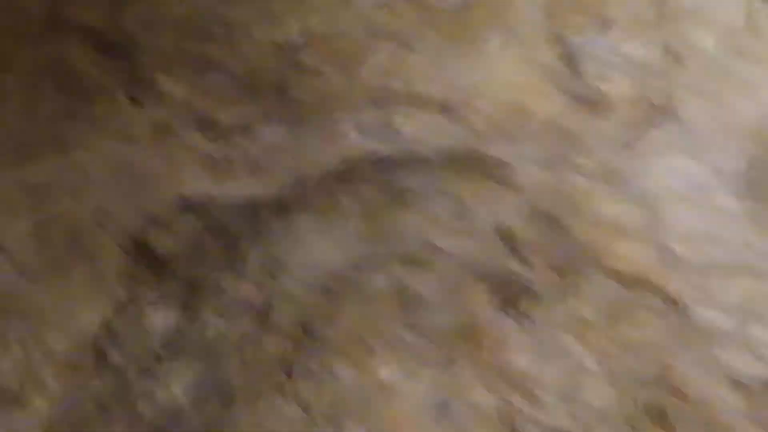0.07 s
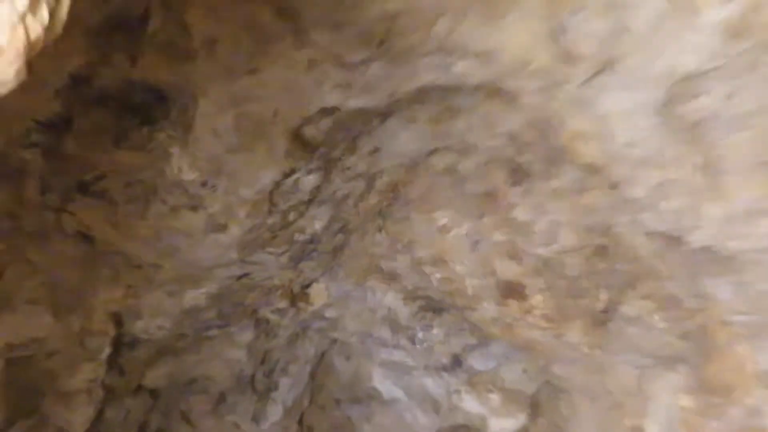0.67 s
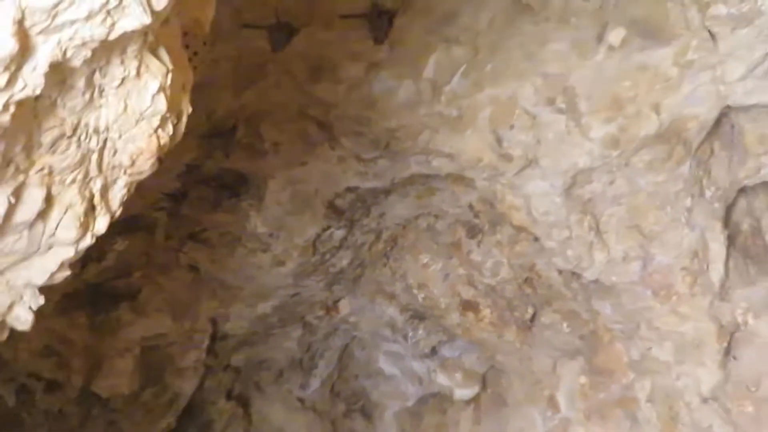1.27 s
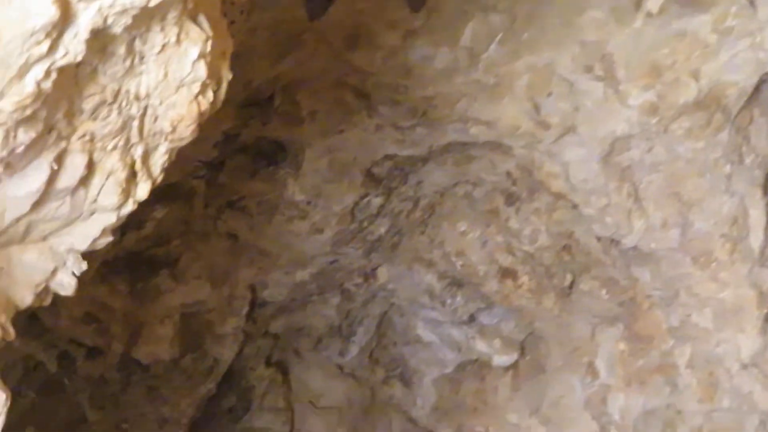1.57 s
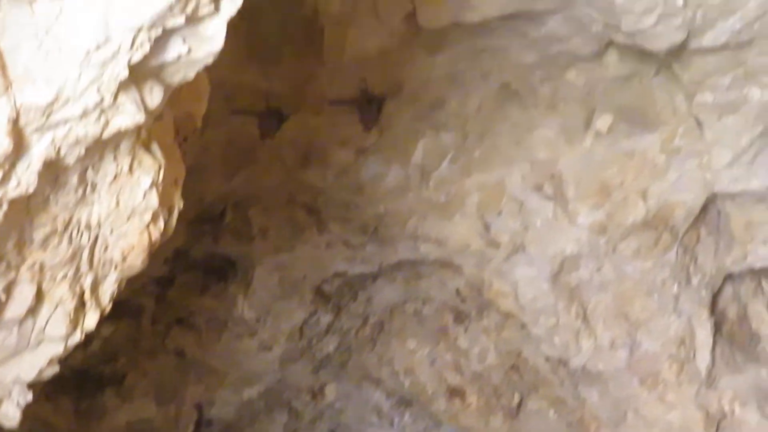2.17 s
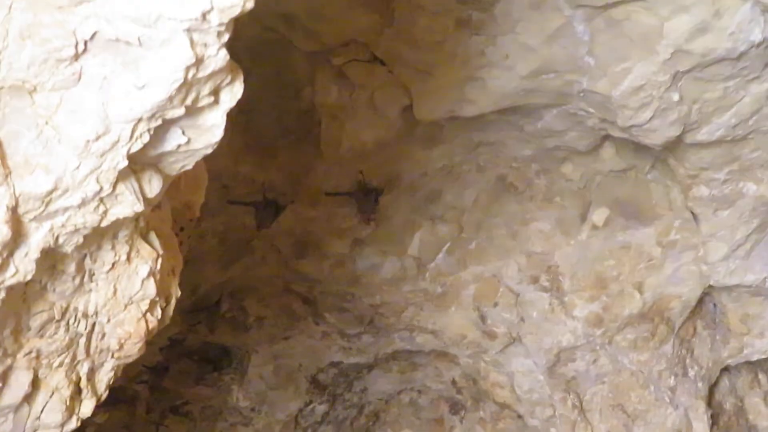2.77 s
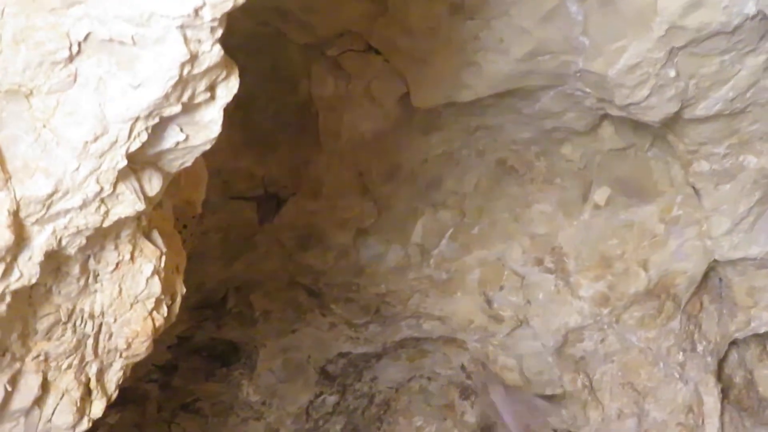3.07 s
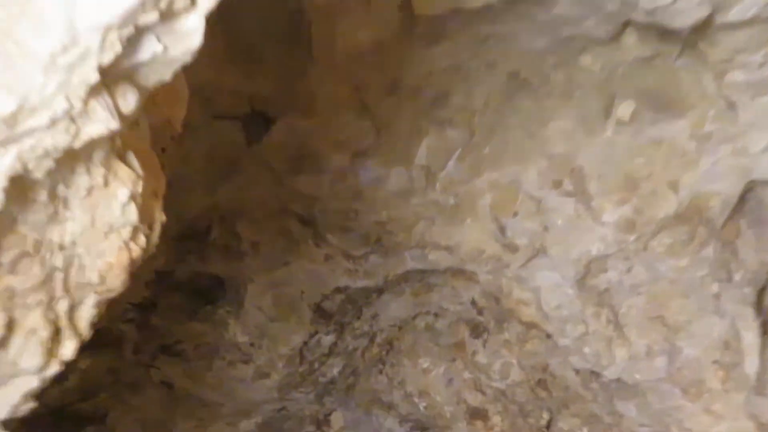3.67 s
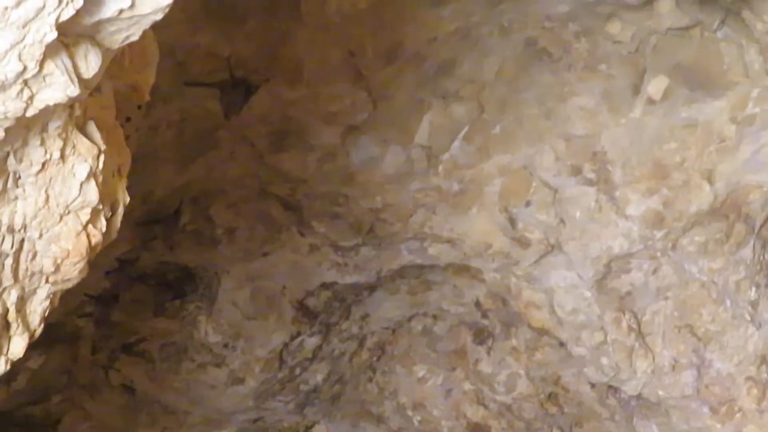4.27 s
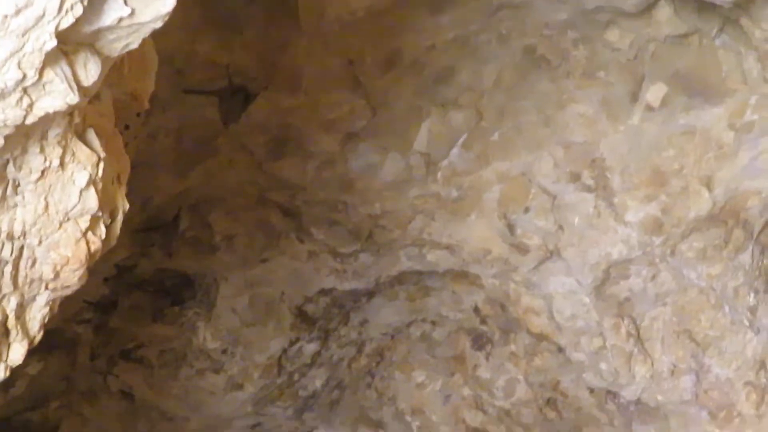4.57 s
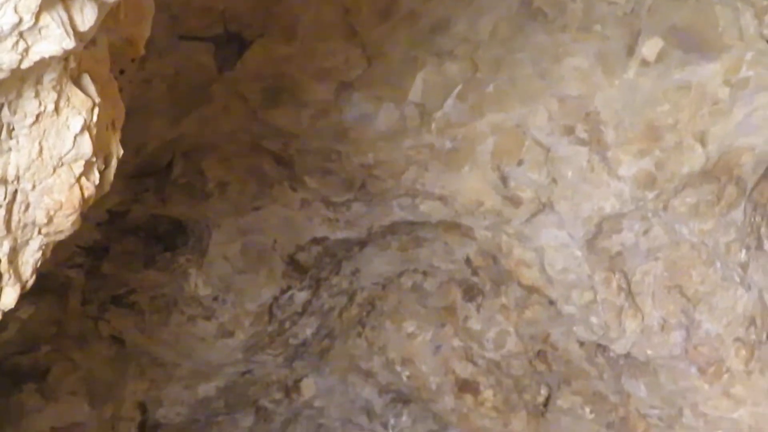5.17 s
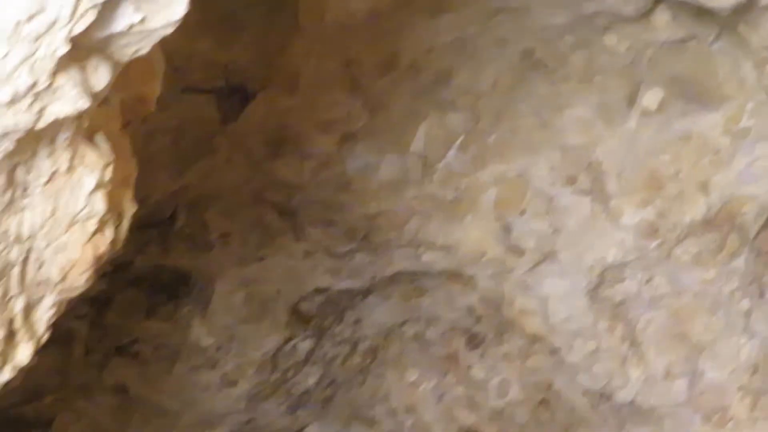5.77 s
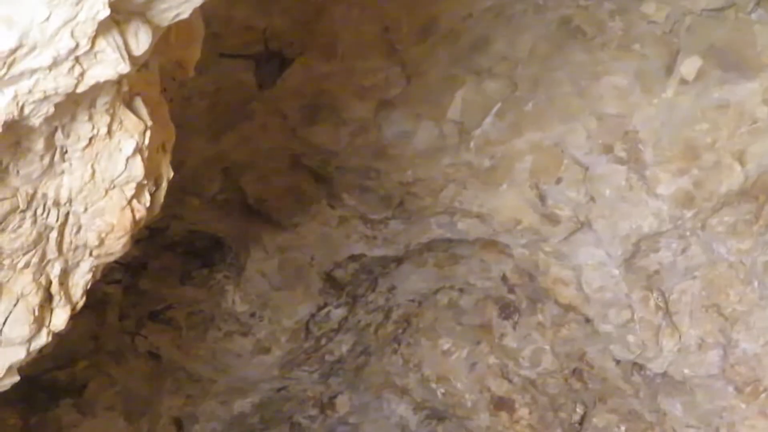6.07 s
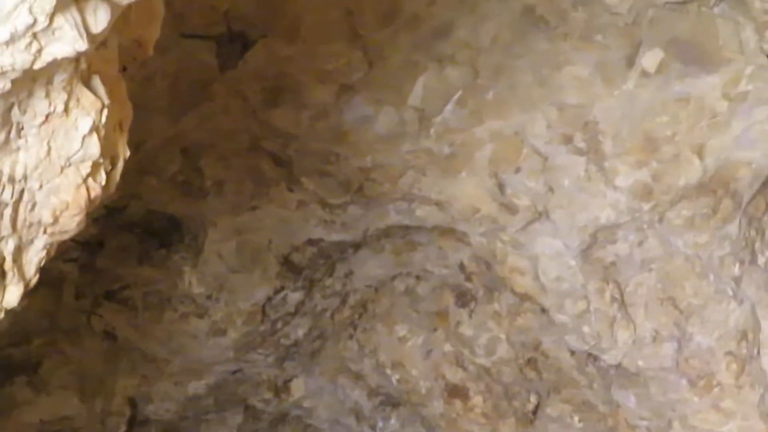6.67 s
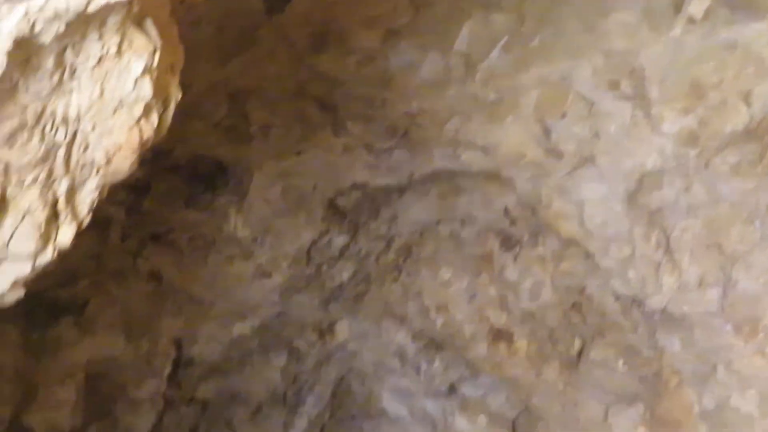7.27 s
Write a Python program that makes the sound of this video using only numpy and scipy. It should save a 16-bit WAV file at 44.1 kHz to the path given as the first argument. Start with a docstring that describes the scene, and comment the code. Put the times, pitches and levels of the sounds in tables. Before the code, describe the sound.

Small bats give very high chirps in a rocky cave, over soft hiss, camera whirring, handling bumps and one hard knock.

```python
"""Bats in a rocky cave

Small bats chirp: each call is a steep downward whistle, smeared by echoes off the rock. Behind them
are a soft rush of air, hiss, a hollow drone and faint pips. A hand-held camera rumbles, its zoom
motor whirs twice and fingers bump and scuff its body. The hardest knock overloads the microphone,
and the gain control takes about a second to recover."""
import sys
import numpy as np
from scipy import signal
from scipy.fft import rfft, irfft, next_fast_len
from scipy.io import wavfile
from scipy.ndimage import map_coordinates

SR = 44100
rng = np.random.default_rng(int(sys.argv[2]) if len(sys.argv) > 2 else 0)


def dump_mix(stems):
    """Bounce the given channels to the path in sys.argv[1] as a 16-bit WAV at rate SR."""
    frames = np.atleast_2d(stems).T  # one column per channel
    limited = np.clip(frames, -1, 1)  # hard clip at full scale
    pcm = np.round(limited * 32767).astype(np.int16)
    wavfile.write(sys.argv[1], SR, pcm)


N = 328104

# Runs of the zoom motor. Each row: start and stop in seconds, level in dB, rattle in dB relative to it,
# change of the hiss meanwhile in dB, start of the hiss swell that follows in seconds.
ZOOMS = [(0.086, 1.247, -55.5, -25, -5.5, 1.3), (3.546, 3.743, -56, -3, 0, 3.98)]


def amp(db):
    return 10 ** (np.asarray(db) / 20)


def unit(x):
    return x / np.sqrt(np.mean(x ** 2) + 1e-20)


def seconds(length):
    return np.arange(round(length * SR)) / SR


def since(s):
    """Seconds since time s, zero before it."""
    return np.maximum(np.arange(N) / SR - s, 0)


def swell(s, width_s):
    """Rises to 1 at time s and falls away again."""
    return np.exp(-np.abs(np.arange(N) / SR - s) / width_s)


def wobble(rate):
    """A smooth random curve, rate knots a second."""
    return map_coordinates(rng.standard_normal(int(N * rate / SR) + 4), [np.arange(N) * rate / SR])


def filtered(x, response):
    """x shaped by a complex response of frequency."""
    size = x.shape[-1]
    padded = next_fast_len(size + SR // 4)
    return irfft(rfft(x, padded) * response(np.fft.rfftfreq(padded, 1 / SR)), padded)[..., :size]


def resonances(modes, f):
    """Response at f of band-pass modes, each a centre in Hz, a width in Hz and a gain in dB."""
    return sum(amp(db) * 1j * f * width / (hz * hz - f * f + 1j * f * width) for hz, width, db in modes)


def noise(spectrum):
    """Noise of rms 1, coloured by (Hz, dB) points on a log axis."""
    points_hz, db = np.transpose(spectrum)
    colour = lambda hz: amp(np.interp(np.log(hz + 1), np.log(points_hz), db))
    return unit(filtered(rng.standard_normal(N), colour))


def stereo(mid, side, side_db):
    """Left and right from a common and an opposed part."""
    return np.array([mid + amp(side_db) * side, mid - amp(side_db) * side])


def burst(t60, response):
    """A dying stereo puff of noise that takes the colour of the response and keeps its energy."""
    t, onset_s = seconds(.15), .0007
    puff = stereo(*rng.standard_normal((2, len(t))), side_db=-5.5) * amp(-60 * t / t60)
    rung = filtered(puff, response) * (1 - np.exp(-t / onset_s))
    return rung * np.linalg.norm(puff) / np.linalg.norm(rung)


def add(track, s, sound):
    """Mix a sound into the track at time s."""
    part = track[:, max(round(s * SR), 0):][:, :sound.shape[1]]
    part += sound[:, :part.shape[1]]


def air():
    """Air rushes softly in the cave mouth; hiss sinks during the long zoom and swells after each zoom."""
    # Course of the rush. Each row: time in seconds, level in dB, stereo width of its bass in dB.
    course = [(.1, -52, 1), (2.4, -53, 0.5), (3.5, -54.5, -12), (4.5, -55.5, -8.5), (5.1, -53.5, -10.5),
              (6.0, -53.5, 1.5), (7.44, -53.5, 3.5)]
    # Colour of the air, centre and sides. Each row: frequency in Hz, relative level in dB.
    mid_spectrum = [(53, -22.5), (90, -3), (183, -3), (259, -4.5), (328, -6.5), (381, -6), (415, -7),
                    (653, -12), (810, -10.5), (1140, -15), (1920, -17), (4540, -23), (12000, -35.5),
                    (14500, -43.5), (15500, -48.5)]
    side_spectrum = [(53, -28), (100, -12), (165, -2.5), (253, -2), (342, -1), (398, -4), (443, -0.5),
                     (510, -7.5), (626, -6), (1050, -9), (1720, -13), (1880, -13), (8120, -29.5),
                     (13300, -41.5), (15500, -50.5)]
    times, *columns = np.transpose(course)
    rush_db, width_db = [np.interp(since(0), times, column) for column in columns]
    side = noise(side_spectrum)
    side_bass = filtered(side, lambda hz: 1 / (1 + (hz / 480) ** 4))
    full = stereo(noise(mid_spectrum), side + (amp(width_db) - 1) * side_bass, side_db=-1.5)
    rush = filtered(full, lambda hz: 1 / (1 + (hz / 1200) ** 4))
    hiss_db, rise_s, fall_s = -57.5, .18, .19
    rise = lambda s: 1 - np.exp(-since(s) / rise_s)
    dip_db = sum(db * (rise(start) - rise(after)) for start, *_, db, after in ZOOMS)
    swells = sum(rise(after) * np.exp(-since(after) / fall_s) for *_, after in ZOOMS)
    hiss_level = np.hypot(amp(hiss_db + dip_db), amp(-46.5) * swells)
    return amp(rush_db + 1.5 * wobble(7.9)) * unit(rush) + hiss_level * unit(full - rush)


def drone():
    """A hollow, narrow band of noise swells and sinks, each time at a slightly different pitch."""
    # Swells of the drone. Each row: time of the peak in seconds, level in dB, pitch in Hz.
    peaks = [(.28, -52, 393), (.92, -51, 397), (1.19, -54.5, 400), (1.97, -52.5, 380), (2.15, -51.5, 395),
             (3.87, -55.5, 383), (4.27, -57, 415), (4.75, -66, 440), (5.08, -57.5, 413), (5.42, -59, 455),
             (6.02, -55, 381)]

    def band(centre_hz, width_hz=66):
        white = rng.standard_normal((2, N))
        hollow = filtered(white, lambda hz: resonances([(centre_hz, width_hz, 0)], hz) ** 2)
        return unit(stereo(*hollow, side_db=-4.5))

    waver_db = 1.5 * wobble(6)
    swells = sum(amp(db) * swell(s, width_s=.1) * band(hz) for s, db, hz in peaks)
    bed = amp(-66.5) * band(centre_hz=399.3)
    return amp(waver_db) * (bed + swells)


def handling():
    """The camera rumbles softly each time the hands shift, and shudders as the grip settles."""
    # Shifts of the grip. Each row: time of the peak in seconds, level in dB, rise and fall in seconds.
    grips = [(.28, -39.5, 0.049), (.9, -56.5, 1), (2.45, -50.5, 0.16), (2.8, -47, 0.13), (3.05, -52, 0.097),
             (3.75, -53, .06), (6.0, -59.5, 0.49), (6.65, -52, 0.24), (7.3, -45.5, 0.34)]
    # Colour of the rumble. Each row: frequency in Hz, relative level in dB.
    rumble = [(15, -20), (35, -9), (50, 3.5), (75, -5), (130, -15.5), (300, -34), (900, -100)]
    # Shudders in the hand. Each row: start in seconds, level in dB, pitch in Hz, rise and t60 in
    # seconds, gain of the right side in dB.
    shudders = [(0.071, -10, 41.6, 0.024, 0.25, -2), (.262, -29, 38, .015, 0.18, -7),
                (2.725, -24.5, 44.6, 0.075, 0.41, 0), (6.59, -37, 54, .04, .35, 0),
                (7.13, -32, 62.4, 0.085, .6, 0.5), (7.18, -37, 88, .04, 0.31, -1),
                (7.272, -29.5, 57, 0.042, .45, -1)]
    still_hand_db = -67
    grip_power = sum((amp(db) * swell(s, width_s)) ** 2 for s, db, width_s in grips)
    level = np.sqrt(amp(still_hand_db) ** 2 + grip_power)
    out = level * stereo(noise(rumble), noise(rumble), side_db=-20)
    t = seconds(.5)
    for s, db, hz, rise_s, t60, right_db in shudders:
        shudder = amp(db - 60 * t / t60) * (1 - np.exp(-t / rise_s)) * np.sin(2 * np.pi * hz * t)
        add(out, s, shudder * amp([[0], [right_db]]))
    return out


def zoom_motor():
    """The motor whirs, its gears whine and the lens barrel rattles, all with a slight flutter in level."""
    # Colour of the whir. Each row: frequency in Hz, relative level in dB.
    whir_spectrum = [(200, -11), (420, -12), (650, -12), (1100, -7.5), (1800, -6.5), (2800, -7.5),
                     (4400, -12), (8000, -15.5), (14000, -33.5)]
    # Resonances of the gears and the loose barrel, each applied twice.
    # Each row: centre in Hz, width in Hz, gain per pass in dB.
    gear_modes = [(390, 25, -13), (1245, 170, 1.5), (2370, 350, 0.5), (2860, 230, 0), (4380, 300, -3)]
    barrel_modes = [(1440, 380, 7.5), (2360, 450, 4), (2950, 510, 3), (3650, 400, 3), (4270, 380, -8)]

    def ringing(modes):
        return unit(filtered(rng.standard_normal(N), lambda hz: np.abs(resonances(modes, hz)) ** 2))

    whir = amp(-5) * stereo(noise(whir_spectrum), noise(whir_spectrum), side_db=7.5)
    whine = amp(-6) * ringing(gear_modes)
    rattle = ringing(barrel_modes)
    flutter_db = .7 * wobble(25)
    spin_up_s, spin_down_s = .0047, .114
    out = np.zeros((2, N))
    for start, stop, db, rattle_db, *_ in ZOOMS:
        envelope = (1 - np.exp(-since(start) / spin_up_s)) * np.exp(-since(stop) / spin_down_s)
        out += envelope * amp(db + flutter_db) * (whir + whine + amp(rattle_db) * rattle)
    return out


def lens_ticks():
    """The lens mechanism ticks with a thin metal ping, mostly as the motor starts and stops."""
    # Ticks. Each row: start in seconds, level in dB, t60 in seconds, ping in dB relative to the tick.
    ticks = [(.095, -52.5, 0.14, -30), (0.119, -48.5, 0.45, -28), (0.159, -43, 0.044, -30),
             (1.236, -47, 0.026, -20), (1.2386, -36.5, 0.018, -21), (1.24, -48.5, 0.043, -5.5),
             (1.2477, -42, 0.02, -7), (3.55, -45.5, 0.02, -31), (3.556, -40, 0.05, -32),
             (3.5685, -35.5, 0.023, -32), (3.577, -45, 0.025, -32), (3.781, -49, 0.032, -22),
             (5.76, -47.5, 0.028, -25)]
    # Resonances of the lens and of the ping. Each row: centre in Hz, width in Hz, relative gain in dB.
    lens_modes = [(1540, 350, 7.5), (2570, 770, 11), (3530, 160, 4), (4050, 200, 0), (5900, 740, 7)]
    ping_modes = [(11600, 1100, 0)]
    dull_hz = 4700
    tick_colour = lambda hz: resonances(lens_modes, hz) / np.sqrt(1 + (hz / dull_hz) ** 14)
    out = np.zeros((2, N))
    for s, db, t60, ping_db in ticks:
        add(out, s, amp(db + ping_db) * burst(t60, lambda hz: resonances(ping_modes, hz) ** 2))
        add(out, s, amp(db) * burst(t60, tick_colour))
    return out


def scuffs():
    """Grit and skin scuff in short puffs of noise with the top rolled off."""
    # Scuffs. Each row: start in seconds, level in dB, t60 in seconds, treble cutoff in Hz.
    puffs = [(0.117, -41.5, 0.022, 6030), (0.154, -50, 0.059, 5470), (.161, -39, .04, 2400),
             (.167, -34, 0.036, 1980), (.265, -49, 0.55, 3400), (3.262, -47, 0.015, 4000),
             (3.576, -45, 0.078, 3400), (4.011, -58, .025, 3200), (4.173, -48, 0.044, 2800),
             (4.274, -48, .025, 3000), (4.308, -48.5, 0.028, 3000), (4.507, -44, 0.012, 2000),
             (4.709, -45.5, .02, 2600), (5.387, -50, 0.034, 2200), (5.4838, -40, 0.022, 1700),
             (5.4838, -40, 0.007, 6000), (5.728, -41, 0.022, 2900)]
    out = np.zeros((2, N))
    for s, db, t60, cutoff_hz in puffs:
        add(out, s, amp(db) * burst(t60, lambda hz: 1 / np.sqrt(1 + (hz / cutoff_hz) ** 10)))
    return out


def capsules(x, corner_hz):
    """The microphone capsules pass no steady pressure, so each push swings back."""
    return signal.sosfilt(signal.butter(2, corner_hz, "high", fs=SR, output="sos"), x)


def bumps():
    """A finger bump is one soft push on the capsules and a brief ring of the camera body."""
    # Fingers on the camera. Each row: time in seconds, level in dB, contact in seconds, ring in dB
    # relative to the push, gain factor of the right side, bass cut in Hz.
    touches = [(0.181, -7, 0.00082, -23, -0.38, 22), (0.183, -10, 0.0019, -32, -0.45, 22),
               (3.632, -32.5, 0.00054, -4, 0.96, 90), (3.637, -31, 0.0025, -1.5, 0.98, 70),
               (5.39, -36.5, 0.00083, -9, 0.85, 110), (5.4845, -17.5, 0.00016, -12, 1, 139),
               (5.486, -29, 0.00046, -23, 0.84, 140), (5.491, -30, 0.0004, -20, 0.64, 140),
               (5.747, -39, 0.0009, 4.5, 0.74, 100)]
    # Modes of the camera body. Each row: pitch in Hz, relative level in dB, t60 in seconds.
    body_modes = [(310, -8.5, 0.041), (438, -4.5, 0.041), (783, -14, 0.04), (1170, -4, 0.011),
                  (1730, -11.5, 0.013)]
    out, lead_s = np.zeros((2, N)), .01
    t = seconds(.12) - lead_s
    after = np.maximum(t, 0)
    ring = sum(amp(db - 60 * after / t60) * np.sin(2 * np.pi * hz * after) for hz, db, t60 in body_modes)
    for s, db, contact_s, ring_db, right, cut_hz in touches:
        push = np.exp(-(t / contact_s) ** 2)
        thud = capsules(push + amp(ring_db) * ring * (1 - push), cut_hz)
        add(out, s - lead_s, amp(db) * thud * [[1], [right]])
    return out


def end_stop():
    """The lens meets its end stop after the long zoom with a short clink."""
    # Modes of the clink. Each row: pitch in Hz, level in dB, t60 in seconds.
    modes = [(1980, -31.5, 0.036), (2590, -33.5, 0.031), (3630, -40, 0.032)]
    start_s, onset_s = 1.2455, .0014
    out, t = np.zeros((2, N)), seconds(.1)
    ring = sum(amp(db - 60 * t / t60) * np.sin(2 * np.pi * hz * t) for hz, db, t60 in modes)
    add(out, start_s, ring * (1 - np.exp(-t / onset_s)) * np.ones((2, 1)))
    return out


def knock():
    """One hard blow beside the microphone reaches the left capsule first and booms through the shell."""
    # The recorder's filter rings with a brief hollow tone just before and after the knock.
    # Each row: pitch in Hz, level in dB, rise and fall in seconds.
    filter_ringing = [(388, 2.5, 0.0018, 0.0027), (477, -16, 0.021, 0.0034)]
    hit_s, lead_s, lag_s = 2.4907, .03, .00089
    contact_s, onset_s, pre_ring_s = .00087, .0005, .016
    t = seconds(.15) - lead_s
    age = t + lag_s * np.array([[.5], [-.5]])

    def ring(time, hz, db, t60):
        after = np.maximum(time, 0)
        envelope = amp(db - 60 * after / t60) * (1 - np.exp(-after / onset_s))
        return envelope * np.sin(2 * np.pi * hz * after)

    blow = capsules(amp(3) * np.exp(-(age / contact_s) ** 2), corner_hz=33)
    blow += ring(age, hz=223, db=12, t60=.0091)  # the shell booms in both capsules alike
    # a low boom, opposite in left and right, widens the knock
    blow += ring(t, hz=167, db=-.5, t60=.022) * [[-1], [1]]
    blow -= ring(age, hz=36, db=-7.5, t60=.074)  # the whole camera recoils in the hand
    fade_in = np.clip((age + pre_ring_s) / (2 * onset_s), 0, 1)
    for hz, db, rise_s, fall_s in filter_ringing:
        envelope = fade_in * np.exp(-np.abs(age) / np.where(age < 0, rise_s, fall_s))
        blow += amp(db) * envelope * np.cos(2 * np.pi * hz * age)
    out = np.zeros((2, N))
    add(out, hit_s - lead_s, blow)
    return out


def pips():
    """Hollow pips like distant drips: a few clear ones among ten fainter ones scattered at random."""
    # The clearest pips. Each row: start in seconds, level in dB, pitch in Hz.
    clear = [(3.006, -53, 900), (3.206, -48.5, 945), (4.508, -50, 810), (4.71, -51, 825), (5.1, -54, 815)]
    faint_span_s, faint_db, faint_hz = (2.6, 5.3), -55.5, 906
    t60, width_hz = .069, 310
    faint = [(np.interp(when, (0, 1), faint_span_s),
              faint_db + 4 * (size - .5),
              faint_hz * (1 + .14 * (pitch - .5))) for when, size, pitch in rng.random((10, 3))]
    out = np.zeros((2, N))
    for s, db, hz in list(clear) + faint:
        add(out, s, amp(db) * burst(t60, lambda f: resonances([(hz, width_hz, 0)], f) ** 2))
    return out


def cave(t60, build_s, near_s=.013, near_db=-2.5, count=12):
    """Small echoes off near rock and a dense tail that builds and dies, new for each place of calling."""
    t = seconds(.2)
    tail = stereo(*rng.standard_normal((2, len(t))), side_db=-5)
    tail *= amp(-60 * t / t60) * (1 - np.exp(-t / build_s))
    tail /= np.linalg.norm(tail[0])
    arrival = (rng.uniform(.1, 1, count) * near_s * SR).astype(int) + 2
    strength = amp(near_db) * rng.choice([-1, 1], count) / np.sqrt(count)
    tail[0, arrival] += strength
    tail[1, arrival + rng.choice([-1, 0, 0, 1], count)] += strength  # each wall has its own direction
    return tail / np.linalg.norm(tail[0])


def bats():
    """Each call dives in pitch, peaks as it crosses the throat's resonance and echoes off the rock."""
    # Bat calls. Each row: start and length in seconds, first and last pitch in Hz, level in dB, echo in
    # dB relative to the call, throat resonance and its half-width in Hz, echo build-up and t60 in seconds.
    calls = [(2.9515, .012, 16300, 10000, -14.5, -4, 11240, 230, .002, .105),
             (3.915, .007, 15600, 10900, -37, 4, 12500, 900, .001, 0.075),
             (4.937, .009, 15500, 10750, -45, 6.5, 12900, 1100, .003, .07),
             (5.6828, 0.011, 13700, 8680, -15.5, 7.5, 11800, 700, .002, 0.097),
             (6.0836, .009, 16500, 10440, -33.5, 18.5, 11600, 950, .016, 0.087),
             (6.531, .01, 15000, 9500, -35, 17, 11300, 1300, .014, 0.093),
             (6.553, 0.0073, 15100, 11200, -29, 7.5, 12900, 800, .006, .095)]
    edge_softness, echo_top_hz = .7, 14900  # the cave air swallows the echoes above this pitch
    out = np.zeros((2, N))
    for s, length, start_hz, end_hz, db, echo_db, throat_hz, width_hz, build_s, t60 in calls:
        progress = seconds(length) / length
        pitch = 1 / (1 / start_hz + progress * (1 / end_hz - 1 / start_hz))  # the period grows evenly
        throat = 1 / np.hypot(1, (pitch - throat_hz) / width_hz)
        envelope = np.sin(np.pi * progress) ** edge_softness
        call = np.sin(2 * np.pi * np.cumsum(pitch) / SR) * throat * envelope
        echoes = signal.fftconvolve(call[None], cave(t60, build_s), axes=1)
        echoes = filtered(echoes, lambda hz: 1 / np.sqrt(1 + (hz / echo_top_hz) ** 50))
        echoes *= amp(echo_db) * np.linalg.norm(call) / np.linalg.norm(echoes[0])
        add(out, s, amp(db) * call[None])
        add(out, s, amp(db) * echoes)
    lag_s = 3.1e-5  # the bats are a little to the right
    return filtered(out, lambda hz: np.exp(1j * np.pi * hz * lag_s * np.array([[-1], [1]])))


def scene():
    """The bats, the camera's own noises and the cave's background."""
    calls = bats()
    camera = knock() + bumps() + handling() + zoom_motor() + lens_ticks() + end_stop() + scuffs()
    return calls + camera + pips() + air() + drone()


def gain_control(x, limit_db, share, recovery_db_per_s, attack_s):
    """A peak over the limit ducks the gain by a share of its excess; the gain then climbs back."""
    peak_db = 20 * np.log10(np.abs(x).max(axis=0) + 1e-9)
    over_db = share * np.maximum(peak_db - limit_db, 0)
    ramp_db = recovery_db_per_s * np.arange(N) / SR
    cut_db = np.maximum.accumulate(over_db + ramp_db) - ramp_db
    pole = np.exp(-1 / (attack_s * SR))
    return x * amp(-signal.lfilter([1 - pole], [1, -pole], cut_db))


def record(dry):
    """The camera fades in, rides its gain, saturates dully at full scale and cuts the highest treble."""
    start_s, fade_s = .072, .0145
    hardness, dull_hz, top_hz = 7, 2700, 15800
    fade_in = np.minimum(since(start_s) / fade_s, 1)
    held = gain_control(dry * fade_in, limit_db=-4, share=.65, recovery_db_per_s=8.5, attack_s=.017)
    saturated = held / (1 + np.abs(held) ** hardness) ** (1 / hardness)
    distortion = filtered(saturated - held, lambda hz: 1 / (1 + (hz / dull_hz) ** 8))
    return filtered(held + distortion, lambda hz: hz < top_hz)


dry = scene()
out = record(dry)
dump_mix(out)
```